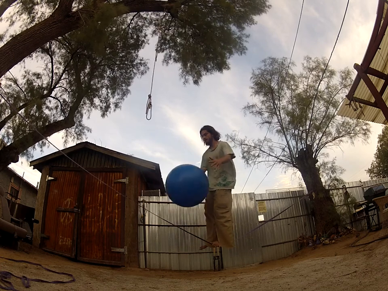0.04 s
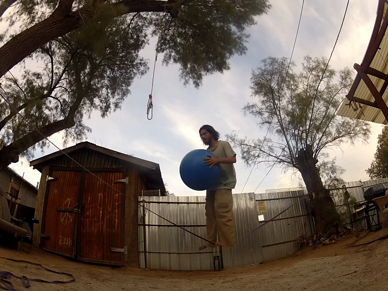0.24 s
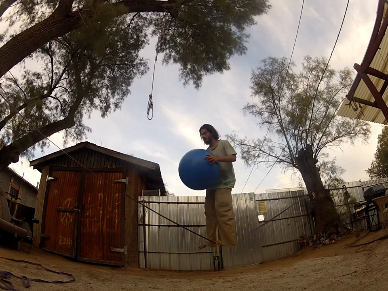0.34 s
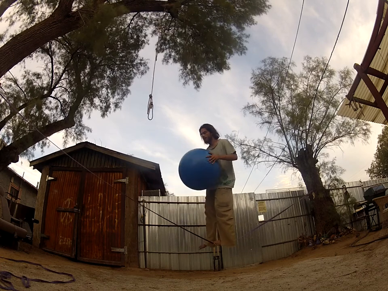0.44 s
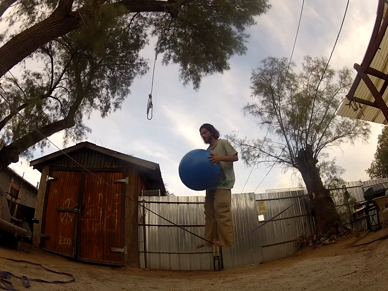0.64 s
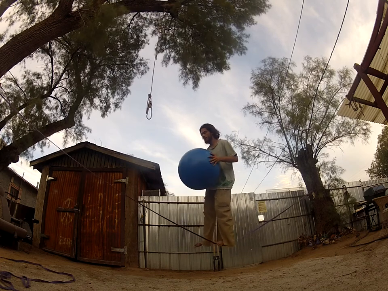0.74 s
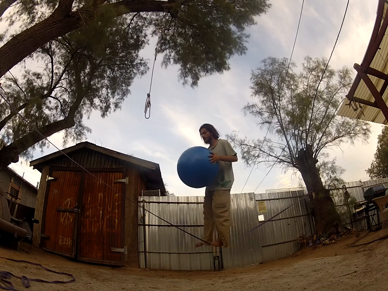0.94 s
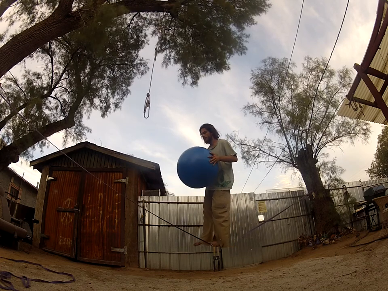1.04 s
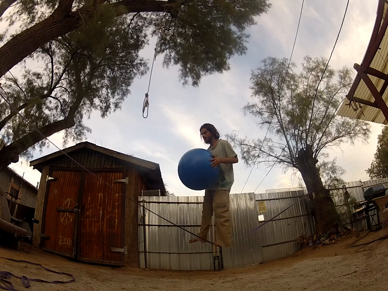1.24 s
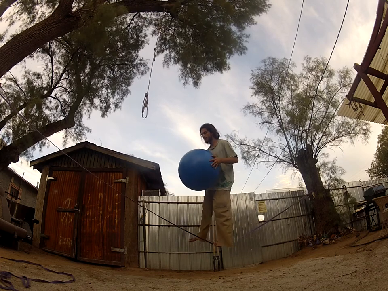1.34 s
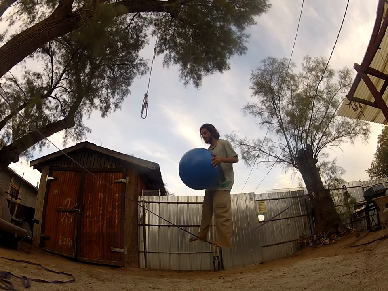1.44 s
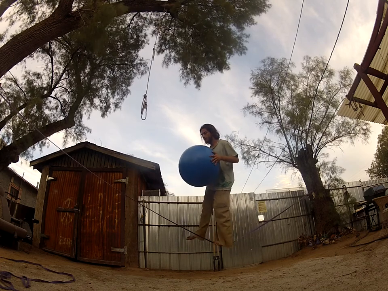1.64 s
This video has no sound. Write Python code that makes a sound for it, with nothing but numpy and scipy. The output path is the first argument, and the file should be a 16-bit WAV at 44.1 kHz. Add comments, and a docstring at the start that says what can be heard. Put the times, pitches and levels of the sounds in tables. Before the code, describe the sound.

A big air-filled rubber ball is caught in both hands with one short hollow thump outdoors.

```python
"""A big air-filled rubber ball is caught with both hands in a yard: boom, hollow knock, two close palm slaps.
Pressure swings make the boom, decaying cosines the knock, shaped noise the slaps and cracks.
Skin and enclosed air ring on as decaying modes; ground, fence and shed scatter it back as decaying noise.
First the low rumble of an earlier bounce dies away and a faint touch follows, over slowly easing wind noise.
A small camera mirrors a low band into a thin treble sizzle."""
import sys
import numpy as np
from scipy import signal
from scipy.fft import irfft
from scipy.io import wavfile

SR = 44100
rng = np.random.default_rng(int(sys.argv[2]) if len(sys.argv) > 2 else 0)


def inscribe(sig):
    """Save sig as 16-bit PCM at rate SR to the path in sys.argv[1].

    A 1-D sig is mono; a 2-D sig holds one channel per row.
    Samples are clipped to [-1, 1] before scaling.
    """
    pcm = np.round(np.clip(np.atleast_2d(sig).T, -1, 1) * 32767)
    wavfile.write(sys.argv[1], SR, pcm.astype(np.int16))


N = 74970

# contacts: t/s, boom/dB, push (+1 in, -1 out), knock/dB, slap/dB, crack/dB
CONTACT_EVENTS = [(0.2116, -8.5, 1, -16.5, -28.5, -42.5), (0.2244, -20, -1, -41.5, -33.5, -30.5)]


def undb(db):
    """Decibels to gain."""
    return 10 ** (np.asarray(db) / 20)


def noise(colour):
    """Random-phase noise of rms 1; colour rows are f/Hz, relative density/dB."""
    hz, db = np.array(colour, float).T
    f = np.maximum(np.fft.rfftfreq(N, 1 / SR), 1)
    gain = undb(np.interp(np.log(f), np.log(hz), db))
    phase = 2 * np.pi * rng.random(len(f))
    x = irfft(np.exp(1j * phase) * gain, N)
    return x / x.std()


def filtered(x, hz, kind, order):
    """Butterworth filter."""
    return signal.sosfilt(signal.butter(order, hz, kind, fs=SR, output="sos"), x)


def since(start_s):
    """Seconds since a moment, zero before it."""
    return np.maximum(np.arange(N) / SR - start_s, 0)


def fade(age_s, t60_s):
    """Exponential decay by 60 dB in t60_s."""
    return np.exp(-np.log(1000) * age_s / t60_s)


def catch():
    """The first contact pushes the skin in, the second swings it back out.

    Each has a broad pressure swing, a hollow knock, a slap and a sharp crack.
    """
    # palm on rubber: f/Hz, relative density/dB
    slap_colour = [(200, -18), (400, -14), (600, 19.5), (850, -5), (1080, -12), (1500, 6.5), (2100, 2),
                   (3500, -3), (5000, -13.5), (9000, -9.5), (15000, -12)]
    # palm landing flat: f/Hz, relative density/dB
    crack_colour = [(500, -27), (1100, -25), (2000, 1), (4500, 1.5), (7000, -1.5), (15000, -15)]
    boom_hz, boom_delay_s = 153.6, 0.0039
    knock_hz, knock_t60_s, knock_rise_s = 729, 0.021, 0.00262
    slap_rise_s, slap_t60_s = 0.00053, 0.047
    crack_delay_s, crack_width_s = 0.002067, 0.00027

    t = np.arange(N) / SR
    out = np.zeros(N)
    for start, boom_db, push, knock_db, slap_db, crack_db in CONTACT_EVENTS:
        age = since(start)

        # Ricker pulse
        swing = (np.pi * boom_hz * (t - start - boom_delay_s)) ** 2
        boom = np.sign(push) * (2 * swing - 1) * np.exp(-swing)
        out += undb(boom_db) * boom

        knock_env = np.minimum(age / knock_rise_s, 1) * fade(since(start + knock_rise_s), knock_t60_s)
        knock = knock_env * np.cos(2 * np.pi * knock_hz * (age - knock_rise_s))
        out += undb(knock_db) * knock

        slap_env = np.minimum(age / slap_rise_s, 1) ** 2 * fade(since(start + slap_rise_s), slap_t60_s)
        out += undb(slap_db) * slap_env * noise(slap_colour)

        crack_env = np.exp(-((t - start - crack_delay_s) / crack_width_s) ** 2)
        out += undb(crack_db) * crack_env * noise(crack_colour)
    return out


def ring():
    """Skin and enclosed air ring on after the first contact; each mode needs a few cycles to build up."""
    # modes of skin and air: f/Hz, relative level/dB, t60/s
    ball_modes = [(132, -19, .24), (189, -25, .3), (248, -35, .34), (288, -34, .33), (452, -36, .2),
                  (476, -31, .23), (567, -43, .2), (624, -45, .18), (733, -30, .2), (959, -46, .28),
                  (1205, -56, .5), (1610, -55, .45), (1861, -52, .3), (2064, -44, .22), (2141, -52, .33),
                  (2277, -54, .35), (2793, -56, .45), (2940, -50, .2)]
    ring_gain_db, rise_cycles = 1, 4.8

    age = since(CONTACT_EVENTS[0][0])
    out = np.zeros(N)
    for hz, db, t60_s in ball_modes:
        env = np.minimum(age * hz / rise_cycles, 1) * fade(age, t60_s)
        out += undb(ring_gain_db + db) * env * np.sin(2 * np.pi * hz * age)
    return out


def yard():
    """Dense reflections from ground, fence and shed, with a faint longer tail."""
    # early scatter: f/Hz, relative density/dB
    early_colour = [(25, -23), (55, -19), (130, 6.5), (260, -4), (370, -15.5), (600, -7.5), (850, -13.5),
                    (1100, -34), (1600, -22.5), (2600, -26), (3500, -27), (5000, -34.5), (9500, -35),
                    (15000, -40)]
    # longer tail: f/Hz, relative density/dB
    late_colour = [(40, -7), (150, 5.5), (270, 4), (400, -17), (1100, -18), (2000, -20.5), (2900, -21),
                   (5000, -52), (9500, -32.5), (15000, -38)]
    delay_s, rise_s = 0.0076, 0.0031
    early_db, early_t60_s = -29, 0.27
    late_db, late_t60_s = -38.5, 0.79

    age = since(CONTACT_EVENTS[0][0] + delay_s)
    early = undb(early_db) * noise(early_colour) * fade(age, early_t60_s)
    late = undb(late_db) * noise(late_colour) * fade(age, late_t60_s)
    return np.minimum(age / rise_s, 1) * (early + late)


def before_catch():
    """Low rumble of an earlier bounce dying away, then a faint touch just before the catch."""
    # Gaussian swells of the rumble: t/s, width/s, level/dB
    swells = [(0.031, 0.047, -40), (0.192, 0.018, -33)]
    # rumble: f/Hz, relative density/dB
    rumble_colour = [(25, -36), (45, -22), (70, -2.5), (150, 8.5), (240, 5.5), (360, -13.5), (700, -16.5),
                     (1100, -29.5), (3000, -40), (8000, -77)]

    t = np.arange(N) / SR
    env = np.zeros(N)
    for at, width_s, db in swells:
        env += undb(db) * np.exp(-((t - at) / width_s) ** 2)
    return noise(rumble_colour) * env


def wind():
    """Low rumble and faint hiss as noise whose level slowly eases."""
    # wind: f/Hz, relative density/dB
    wind_colour = [(15, -40), (25, -20.5), (48, -2), (100, -0.5), (146, -1.5), (224, -7), (350, -10.5),
                   (620, -14), (900, -23.5), (1180, -25), (1500, -29), (3000, -38), (4620, -41),
                   (6040, -41), (8000, -45.5), (11500, -46), (15000, -49.5)]
    mid_db, mid_s, fall_db_per_s = -49.5, 1.5, 1.08

    level_db = mid_db - fall_db_per_s * (since(0) - mid_s)
    return noise(wind_colour) * undb(level_db)


def scene():
    """The catch, its ring and echoes, the low rumble before it and the wind."""
    return (catch() + ring() + yard() + before_catch() + wind())[None]


def record(dry):
    """The camera notches the treble, mirrors a low band to both sides of a carrier and cuts the top."""
    notch_hz, notch_q, top_hz = 6000, 3.27, 15100
    band_hz, carrier_hz, sideband_db = 1380, 12000, -18.5

    low = filtered(dry, band_hz, "low", order=2)
    low = filtered(low, band_hz, "high", order=1)
    # factor 2: the product splits into two half-amplitude sidebands
    mirror = 2 * undb(sideband_db) * low * np.cos(2 * np.pi * carrier_hz * since(0))

    b, a = signal.iirnotch(notch_hz, notch_q, fs=SR)
    x = signal.lfilter(b, a, dry) + mirror
    # order 8, 0.2 dB ripple, 70 dB stopband
    return signal.sosfilt(signal.ellip(8, .2, 70, top_hz, fs=SR, output="sos"), x)


dry = scene()
out = record(dry)
inscribe(out)
```